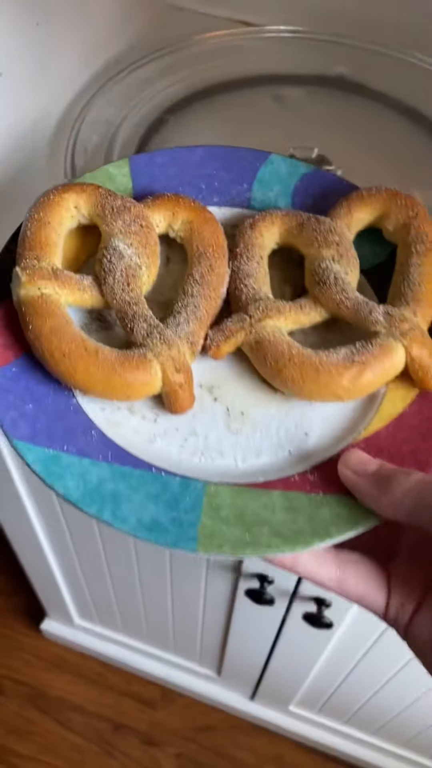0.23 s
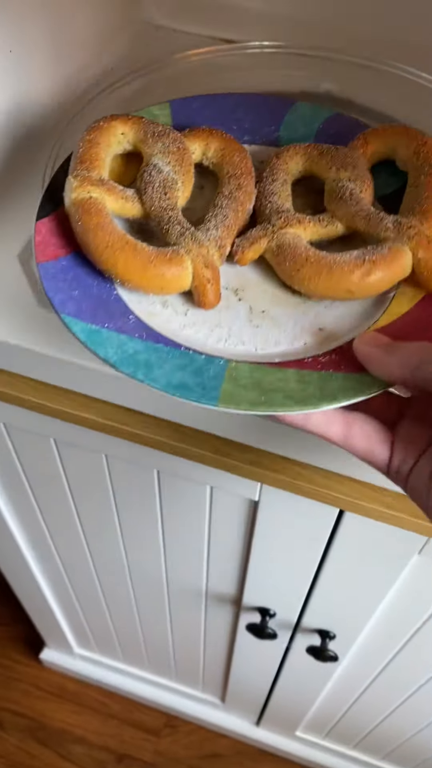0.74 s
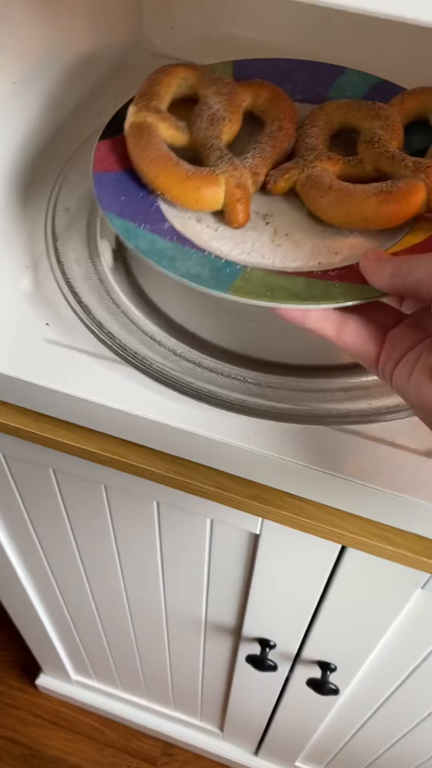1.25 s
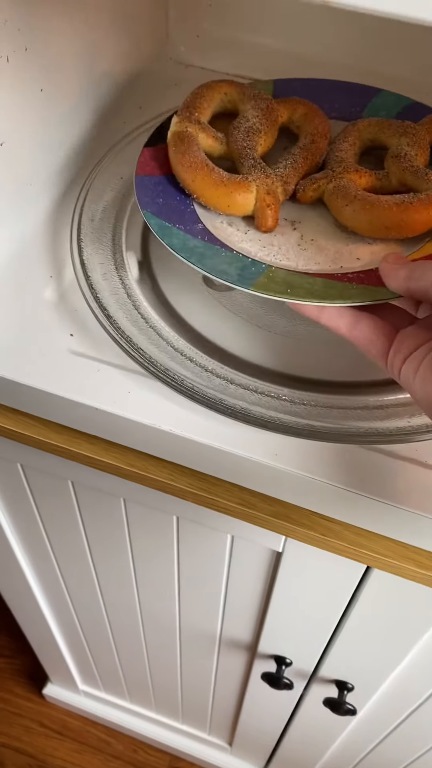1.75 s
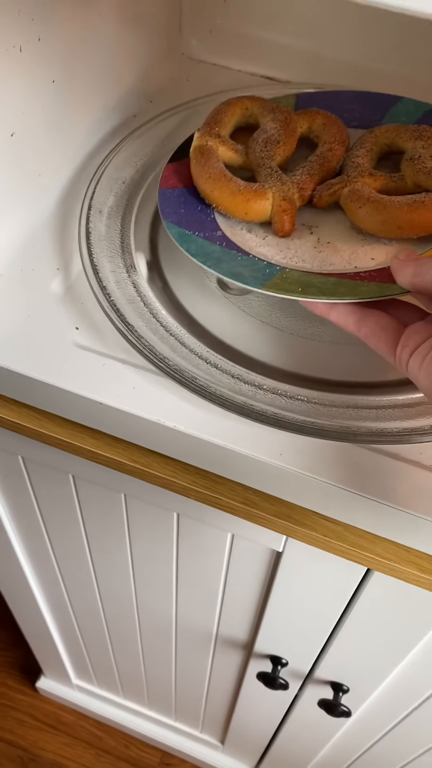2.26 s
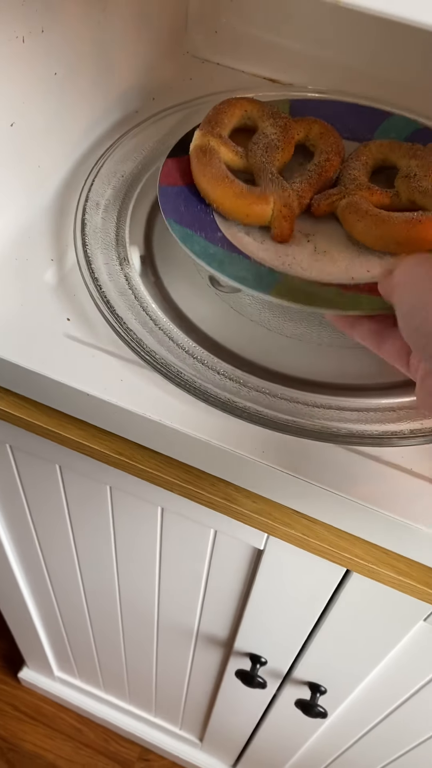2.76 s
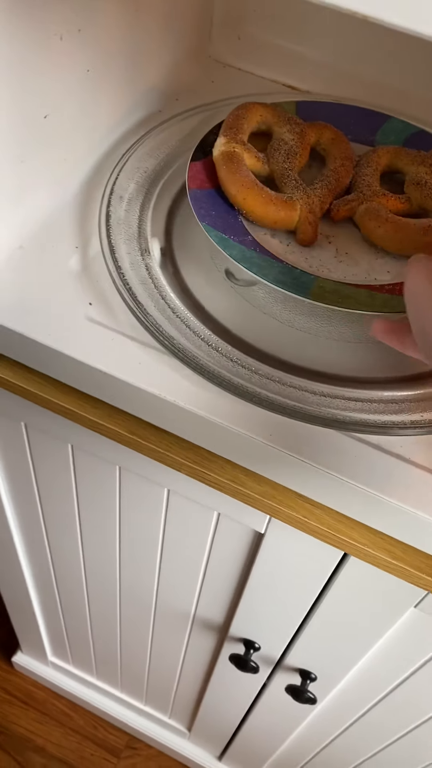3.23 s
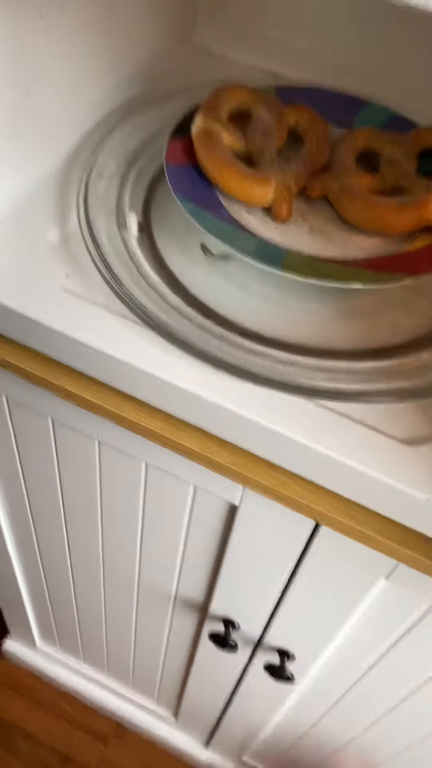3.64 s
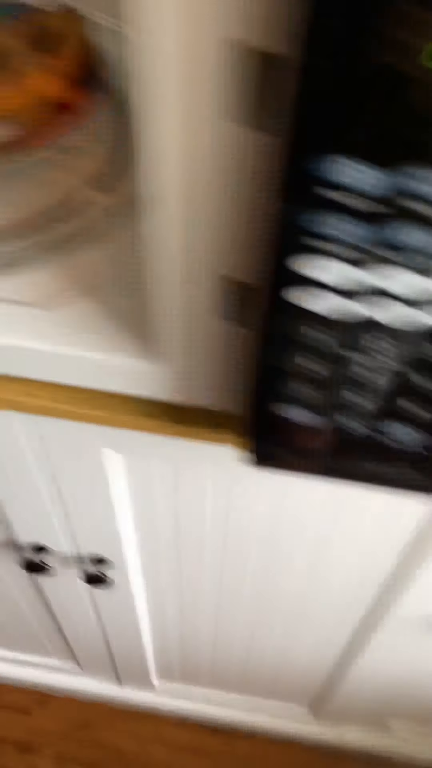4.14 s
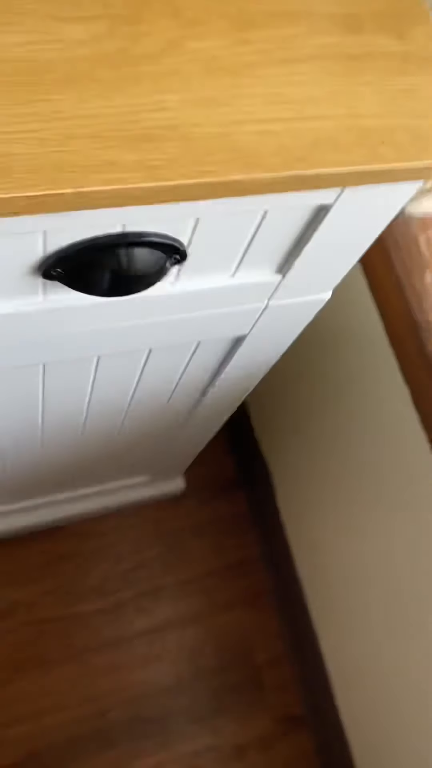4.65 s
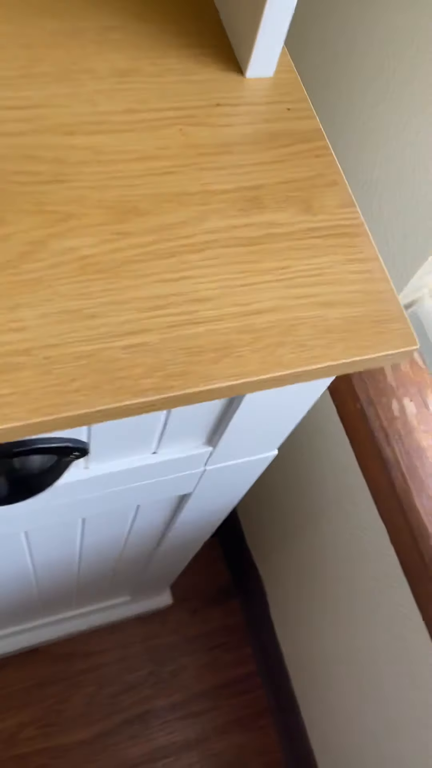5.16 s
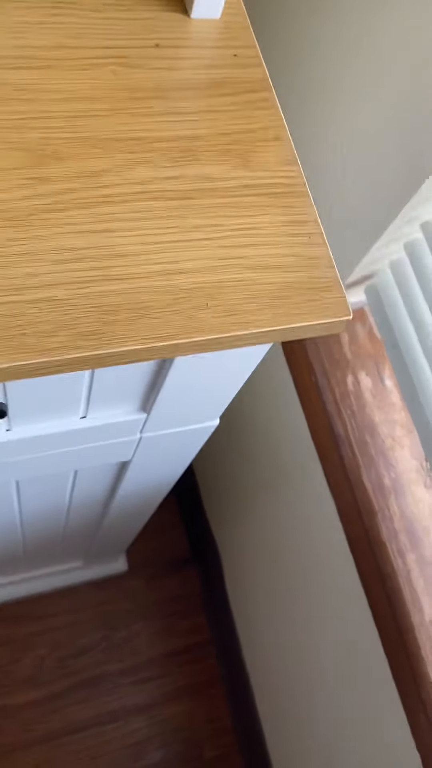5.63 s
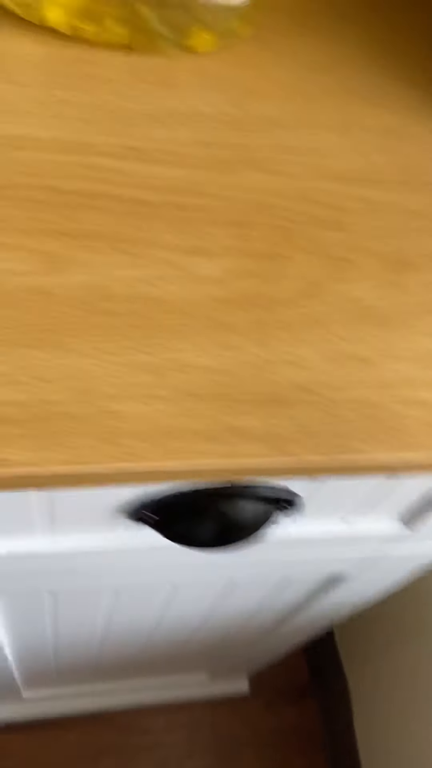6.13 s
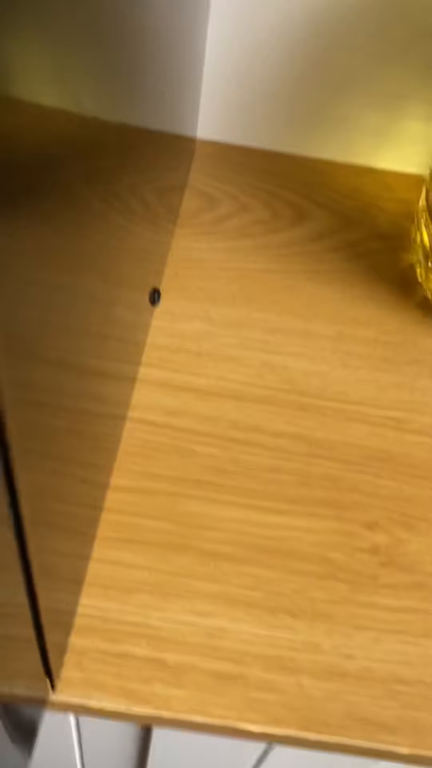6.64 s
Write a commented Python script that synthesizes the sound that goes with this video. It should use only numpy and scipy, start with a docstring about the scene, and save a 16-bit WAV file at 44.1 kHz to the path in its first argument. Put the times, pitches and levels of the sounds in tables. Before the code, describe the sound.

Over low kitchen rumble, a ceramic plate bumps inside a microwave with light rim ticks, then lands on the glass turntable in a bright chattering clink. It scrapes briefly and clinks down again, sharper. A sleeve rustles, soft footfalls and small clicks follow, and the door slams with a latch clatter and hollow metal boom. Close handheld stereo microphone, small room.

```python
"""Over the low rumble of a small kitchen, a ceramic plate bumps into a microwave oven and its rim ticks.
It drags on the glass turntable and lands in two chattering clinks; clothes rustle with soft footfalls and small
clicks, and the door is pushed shut: latch, slam, booming steel case. Plate, tray and case ring as decaying sines;
clacks, rattles and footfalls are coloured noise dying away, and strokes of noise make the cloth and the graze.
The hand-held stereo recorder limits loud treble, as in the clinks."""
import sys
import numpy as np
from scipy import signal
from scipy.fft import rfft, irfft
from scipy.io import wavfile
from scipy.ndimage import uniform_filter1d, minimum_filter1d

SR = 44100
rng = np.random.default_rng(int(sys.argv[2]) if len(sys.argv) > 2 else 0)


def dump(signal):
    """Clip the signal to [-1, 1] and save it as 16-bit WAV at the path in sys.argv[1]."""
    limited = np.clip(np.atleast_2d(signal).T, -1, 1)
    pcm = np.round(limited * 32767).astype(np.int16)
    wavfile.write(sys.argv[1], SR, pcm)


N = 303849
LENGTH = 49152  # samples in one struck sound
T = np.arange(LENGTH) / SR

# modes of the ceramic plate: mode_hz, relative_level_db
PLATE_MODES = [(1110, -19.5), (1195, 0.5), (1310, -13), (1450, -4.5), (1975, 2), (2060, 0.5), (2099, 4),
               (2352, -1), (2430, -12.5), (3205, 3), (3290, -18), (3957, -9.5), (4700, 0), (6352, -12),
               (9375, -6.5)]
# modes of the glass tray: mode_hz, relative_level_db, t60_s
TRAY_MODES = [(371, -9, .6), (393, -11, 1.1), (937, -5, .8), (1157, -5, .55), (1238, -11, .75),
              (1710, -13, .9), (1933, -9, 1.05), (1995, -2, .6), (2180, -8, .55), (2433, -9, .6),
              (2751, -12, .6), (2956, -1, .62), (3230, -7, .58), (3950, -16, .6), (4160, -18, .55),
              (4640, -20, .48), (4883, -12, .55), (5440, -20, .48), (5750, -12, .5), (6019, -19, .38),
              (6352, -20, .45), (7704, -22, .26), (8240, -18, .34), (8400, -23, .36), (9370, -22, .42),
              (10020, -23, .38), (10280, -20, .33), (11050, -25, .3), (11720, -20, .26), (12080, -25, .3)]
# colour of a plate contact, before tilt and modes: frequency_hz, relative_level_db
CLACK_COLOUR = [(59, -54), (100, -22), (365, -10), (768, -12), (1170, -7), (1580, -17.5), (2040, -8.5),
                (3540, -19), (5900, -27), (7770, -57), (8280, -36), (10200, -34), (12400, -43.5),
                (13800, -65), (16000, -49.5)]


def amp(db):
    """Decibels to gain."""
    return 10 ** (np.asarray(db) / 20)


def unit(x):
    """Scales to rms 1."""
    return x / np.sqrt(np.mean(x ** 2) + 1e-20)


def read(points, hz):
    """Reads a table on a log-frequency axis."""
    f, value = np.transpose(points)
    return np.interp(np.log(hz + 1), np.log(f + 1), value)


def octaves(hz, centre_hz):
    """Distance in octaves."""
    return np.log2((hz + 1) / centre_hz)


def near(modes, hz, width_hz):
    """1 on a mode, falling towards 0 between modes."""
    return np.max([1 / (1 + ((hz - mode[0]) / width_hz) ** 2) for mode in modes], axis=0)


def add(mix, s, sound):
    """Mixes a sound in at time s."""
    part = mix[:, round(s * SR):][:, :sound.shape[1]]
    part += sound[:, :part.shape[1]]


def grains(depth_db, size):
    """A gain of rms 1 that flickers within milliseconds."""
    flicker = unit(uniform_filter1d(rng.standard_normal(size), size=100))
    return unit(amp(depth_db * flicker))


def noise(colour, size, grain_db=0, likeness=.75):
    """Mid and side noise of rms 1, partly a quarter turn apart; colour gives dB for each frequency."""
    mid, own = rfft(rng.standard_normal((2, size)) * grains(grain_db, size))
    side = 1j * likeness * mid + np.sqrt(1 - likeness ** 2) * own
    hz = np.fft.rfftfreq(size, 1 / SR)
    return unit(irfft(np.array([mid, side]) * amp(colour(hz)), size))


def strokes(rows):
    """Gain of sliding strokes: each swells tenfold over its rise and fades tenfold over its fall."""
    t = np.arange(N) / SR
    levels = [db - 20 * np.maximum((s - t) / rise, (t - s) / fall) for s, db, rise, fall in rows]
    return amp(np.max(levels, axis=0).clip(-200))


def burst(colour, t60, rise, room_db, grain_db=1):
    """Noise dying like countless damped modes, with the kitchen's tail; t60 gives seconds for each frequency."""
    # ring time of the kitchen: frequency_hz, t60_s
    kitchen_t60 = [(80, 0.27), (250, 1), (1000, 0.67), (4000, 0.61), (12000, 0.14)]
    hz, t, z = signal.stft(noise(colour, LENGTH, grain_db), SR, nperseg=256)
    direct = amp(-60 * t / t60(hz)[:, None])
    tail = amp(-60 * t / read(kitchen_t60, hz)[:, None])
    envelope = np.hypot(direct, amp(room_db) * tail)
    sound = signal.istft(z * envelope, SR, nperseg=256)[1][:, :LENGTH]
    return sound * np.minimum(T / rise, 1)


def ring(modes, rise):
    """Decaying sines (Hz, dB, t60) of rms 1 before decay and rise, mid and side a quarter turn apart."""
    t = T[T < 2 * max(t60 for _, _, t60 in modes)]
    z = sum(amp(db) * np.exp((2j * np.pi * hz - np.log(1000) / t60) * t) for hz, db, t60 in modes)
    z = np.pad(z, (0, LENGTH - len(t)))
    size = np.sqrt(sum(amp(db) ** 2 for _, db, _ in modes) / 2)
    return np.array([z.imag, z.real]) / size * np.minimum(T / rise, 1)


def room_tone(rumble_db=-44, tilt=-0.94, drone_hz=73, drone_width_hz=9, drone_db=-48, hum_hz=120, hum_db=-56):
    """Low rumble of the house with a fuzzy drone and a faint mains hum."""
    # colour of the rumble, before tilt: frequency_hz, relative_level_db
    rumble_colour = [(12, -56.5), (20, -36), (37, -22), (58, 0.5), (77, -1.5), (177, -13), (301, -12),
                     (410, -18.5), (472, -19), (513, -24), (2670, -45.5), (5380, -55), (7310, -74),
                     (9950, -55.5), (16000, -92)]
    rumble = noise(lambda f: read(rumble_colour, f) + tilt * octaves(f + 300, 300), N, likeness=0.26)
    drone = noise(lambda f: -20 * np.log10(1 + ((f - drone_hz) / drone_width_hz) ** 2), N)
    hum = np.sin(2 * np.pi * hum_hz * np.arange(N) / SR)
    return amp(rumble_db) * rumble + amp(drone_db) * drone + amp(hum_db) * hum


def oven(blows, spectrum, room_db, low_hz, grain_db, modal_db=7):
    """Panels and latch rattle unevenly while the steel case booms on below them."""
    # modes of the steel case: mode_hz, relative_level_db, t60_s
    case_modes = [(77, -11, 1.6), (93, 5, 0.14), (112.1, 0.5, 0.56), (134.1, -10, 1.24),
                  (142.8, -11.5, 2.15), (182.5, -17, 1.2), (186.3, -7, 0.64), (211.6, -11.5, 1.08),
                  (276, -8, 0.67), (308, -15.5, 0.73), (369, -9.5, 0.24), (375, -16, 0.74),
                  (508, -11.5, 0.33), (670, -22.5, 1.02), (717, -13.5, 0.26)]
    # pitches at which the door's panels and latch rattle: pitch_hz
    rattle_modes = [(941,), (1130,), (1300,), (1630,), (1815,), (2200,), (3100,), (3950,)]
    # ring time of the panels, before each blow's factor: frequency_hz, t60_s
    panel_t60 = [(80, 0.23), (300, 0.26), (1000, 0.21), (4000, 0.26), (12000, 0.19)]
    out = np.zeros((2, N))
    case = ring(case_modes, rise=0.0031)
    for s, db, tilt, rise, t60_factor, boom_db in blows:
        def colour(f):
            low_cut = -20 * np.log10(1 + (low_hz / (f + 1)) ** 2)
            rattles = modal_db * near(rattle_modes, f, width_hz=19)
            return read(spectrum, f) + tilt * octaves(f + 150, 500) + rattles + low_cut
        rattle = burst(colour, lambda f: t60_factor * read(panel_t60, f), rise, room_db, grain_db)
        add(out, s, amp(db) * rattle + amp(boom_db) * case)
    return out


def bumps():
    """The plate bumps the oven's floor, jolting panels and case."""
    # bumps: start_s, level_db, tilt_db_per_octave, rise_s, t60_factor, case_boom_db
    bump_blows = [(0.723, -37, 2.5, 0.0021, 0.75, -74), (0.733, -22, 1.5, 0.0071, 1, -57),
                  (0.752, -20, -2.5, 0.0011, 1, -54), (0.785, -21.5, 0.5, 0.0011, 1, -23.5)]
    # colour of a bump, before tilt, rattles and low cut: frequency_hz, relative_level_db
    bump_colour = [(35, -32), (60, -3.5), (139, -14.5), (180, 3), (244, -27), (301, 0.5), (338, -14),
                   (785, -20), (862, -19), (1170, -29.5), (3940, -38.5), (6430, -53), (7230, -69),
                   (10500, -56), (16000, -88)]
    return oven(bump_blows, bump_colour, room_db=-13.5, low_hz=90.24, grain_db=0.0)


def clack(tilt, t60_s=0.13, room_db=-25.0, modal_db=15, mode_width_hz=28):
    """The short noise of one contact, raised at the modes of plate and tray; tilt in dB per octave."""
    def colour(f):
        modes = modal_db * near(PLATE_MODES + TRAY_MODES, f, mode_width_hz)
        return read(CLACK_COLOUR, f) + modes + tilt * octaves(f, 2000)
    return burst(colour, lambda f: np.full_like(f, t60_s), 0.00028, room_db)


def plate_ring(favoured_hz, focus, t60):
    """The place of contact decides which of the plate's modes speak; focus in dB per octave."""
    modes = [(hz, db - focus * abs(octaves(hz, favoured_hz)), t60) for hz, db in PLATE_MODES]
    return ring(modes, rise=0.0011)


def touches(tick_db=-11, tick_tilt=0.9, focus_per_t60_s=570):
    """Light touches of the rim tick and ring the hand-damped plate; the longer the ring, the fewer modes speak."""
    # touches: start_s, level_db, favoured_pitch_hz, ring_t60_s
    rim_touches = [(0.741, -30.5, 1980, 0.073), (0.785, -43, 2085, 0.6), (0.813, -39, 3200, 0.089),
                   (0.814, -55.5, 6350, 0.19), (0.910, -47.5, 2130, .42), (1.067, -59, 3220, 0.093),
                   (1.857, -48.5, 2130, 0.22), (1.876, -51, 2050, .26), (1.900, -45.5, 3170, 0.068),
                   (1.984, -37.5, 3200, 0.05), (2.733, -37, 2250, .1), (2.803, -29.5, 2090, 0.11),
                   (2.828, -47.5, 3000, 0.063)]
    out = np.zeros((2, N))
    for s, db, hz, t60 in rim_touches:
        # the tick's level is against the ring's
        touch = plate_ring(hz, focus_per_t60_s * t60, t60) + amp(tick_db) * clack(tick_tilt)
        add(out, s, amp(db) * touch)
    return out


def graze(centre_hz=4150, width_hz=800, grain_db=4):
    """A short gritty rasp of glaze on enamel as the rim grazes the oven's wall."""
    # graze: peak_s, level_db, rise_s, fall_s
    graze_strokes = [(0.791, -38.5, 0.0088, 0.033)]
    rasp = noise(lambda f: -20 * np.log10(1 + ((f - centre_hz) / width_hz) ** 2), N, grain_db)
    return strokes(graze_strokes) * rasp


def scrape(slips_per_s=900, tilt=-4.0, modal_db=11, mode_width_hz=45, slip_t60=0.042, knock_hz=480, knock_db=6):
    """Tiny slips of the unglazed foot dragging on the glass tick through plate and tray."""
    # drags: peak_s, level_db, rise_s, fall_s
    drag_strokes = [(1.905, -52.5, 0.11, 0.0686), (2.0, -50.5, 0.045, .05), (2.675, -47, 0.13, 0.36),
                    (2.742, -34, .028, 0.06), (2.81, -30, 0.021, .055), (2.858, -39, 0.18, .01)]

    def colour(f):
        modes = modal_db * near(PLATE_MODES + TRAY_MODES, f, mode_width_hz)
        knock = knock_db * near([(knock_hz,)], f, width_hz=130)
        return read(CLACK_COLOUR, f) + tilt * octaves(f, 2000) + modes + knock
    slips = rng.standard_normal(N) * (rng.random(N) < slips_per_s / SR)
    force = strokes(drag_strokes)
    tick = burst(colour, lambda f: np.full_like(f, slip_t60), 0.0014, room_db=-22)
    tick = tick / np.linalg.norm(tick[0])
    return signal.fftconvolve((unit(slips) * force)[None], tick, axes=1)[:, :N]


def tray_ring(waver_depth=1.0, waver_hz=35):
    """The tray's modes, each wavering as reflections in the oven's cavity blur it."""
    knots = np.arange(256) / waver_hz
    z = 0
    for hz, db, t60 in TRAY_MODES:
        wander = rng.standard_normal(len(knots)) + 1j * rng.standard_normal(len(knots))
        waver = 1 + waver_depth * np.interp(T, knots, wander)
        z = z + amp(db) * waver * np.exp((2j * np.pi * hz - np.log(1000) / t60) * T)
    size = np.sqrt(sum(amp(db) ** 2 for _, db, _ in TRAY_MODES) * (.5 + waver_depth ** 2))
    return np.array([z.imag, z.real]) / size


def landings(unevenness=0.055, ring_focus=32, clink_db=3.5, clink_t60_s=.04, clink_focus=20):
    """The plate chatters onto the glass in a quick run of contacts, ringing while the tray sings."""
    # landings: hardest_contact_s, level_db, brightness_db_per_octave, contact_gap_s, build_up_db_per_contact,
    # settling_db_per_contact, ring_db, ring_pitch_hz, ring_t60_s, tray_db
    plate_landings = [(2.2805, -3, -2, .0085, 25, 16.5, -8.5, 1200, 0.18, -28),
                      (2.877, -1.5, 2, .0062, 8, 1.9, -0.5, 2116, 0.12, -20)]
    # from the softest contact to the hardest: harder is brighter
    clack_tilts = (-7, 4.1)  # dB per octave
    clink_hz = (950, 2100)  # pitch the contact favours
    flattening_tilt = 0.39  # dB per octave per contact after the hardest, as the plate comes to lie flat
    out = np.zeros((2, N))
    for s, db, brightness, gap, build_db, settle_db, ring_db, hz, t60, tray_db in plate_landings:
        add(out, s, amp(ring_db) * plate_ring(hz, ring_focus, t60) + amp(tray_db) * tray_ring())
        for k in range(-3, 6):  # contact 0 is the hardest
            force = amp(db + min(k * build_db, -k * settle_db))
            hardness = np.sqrt(force)
            # the plate's choked ring at this contact
            clink = plate_ring(np.interp(hardness, (0, 1), clink_hz), clink_focus, clink_t60_s)
            tilt = brightness + np.interp(hardness, (0, 1), clack_tilts) + flattening_tilt * max(k, 0)
            contact = clack(tilt) + amp(clink_db) * clink
            contact_s = s + gap * (k + unevenness * rng.standard_normal())
            add(out, contact_s, force * contact)
    return out


def singing(pitch_hz=940):
    """The dragging foot keeps one low mode of the rubbed tray sounding briefly."""
    # singing: peak_s, level_db, rise_s, fall_s
    singing_strokes = [(2.665, -48, .14, .05)]
    turn = 2 * np.pi * pitch_hz * np.arange(N) / SR
    return strokes(singing_strokes) * np.array([np.sin(turn), np.cos(turn)])


def clothes(gain_db=1, grain_db=2):
    """A sleeve slides in grainy strokes as the arm draws back."""
    # strokes of the sleeve, before the gain: peak_s, level_db, rise_s, fall_s
    sleeve_strokes = [(3.488, -79.5, .2, .07), (3.735, -68.5, 0.022, 0.24), (4.1, -70.5, .12, .09),
                      (4.222, -64.5, 0.063, 0.11), (4.348, -56, 0.08, 0.055), (4.398, -62.5, .03, .015),
                      (4.49, -70, 0.055, 0.083)]
    # colour of the cloth: frequency_hz, relative_level_db
    cloth_colour = [(500, -1), (1500, 0.5), (4500, -2.5), (6200, -2.5), (7300, -23.5), (9000, 1.5),
                    (11500, -3), (13500, -10), (15500, -14.5)]
    rustle = noise(lambda f: read(cloth_colour, f), N, grain_db)
    return amp(gain_db) * strokes(sleeve_strokes) * rustle


def footfalls_and_clicks(skirt_db=6, room_db=-16, dull_hz=6500):
    """Soft footfalls and small clicks of cloth, foot or door handle, each one resonance in noise."""
    # footfalls and small clicks: start_s, level_db, centre_hz, width_octaves, rise_s, t60_s
    small_knocks = [ (3.963, -58, 1390, 0.87, 0.0018, 0.047), (4.105, -54.5, 3290, 0.66, .004, 0.05),
                    (4.17, -53.5, 3040, 2.2, 0.0023, 0.026), (4.245, -51.5, 1165, 0.78, 0.0077, 0.092),
                    (4.372, -49, 1474, 1.4, 0.001, 0.05), (4.765, -42.5, 329.5, .5, 0.0044, 0.13),
                    (4.786, -57.5, 5120, 0.095, 0.0028, 0.058), (4.841, -40, 810, 0.98, 0.0036, 0.27),
                    (5.303, -52, 1090, 0.91, 0.016, 0.12), (6.206, -55.5, 987, 1.37, 0.0073, 0.12)]
    out = np.zeros((2, N))
    for s, db, hz, width, rise, t60 in small_knocks:
        def colour(f):
            resonance = -2 * skirt_db * np.log1p((octaves(f, hz) / width) ** 2)
            return resonance - 20 * np.log10(1 + (f / dull_hz) ** 4)
        add(out, s, amp(db) * burst(colour, lambda f: np.full_like(f, t60), rise, room_db))
    return out


def door():
    """Latch and door slam into the oven, whose steel case booms."""
    # latch and door: start_s, level_db, tilt_db_per_octave, rise_s, t60_factor, case_boom_db
    door_blows = [(5.565, -27.5, 1, 0.0087, 0.92, -51.5), (5.590, -15.5, -1.5, 0.011, 0.65, -34.5),
                  (5.613, -27.5, 1, 0.0014, 0.77, -43), (5.636, -19, 2, 0.004, 1.1, -36.5),
                  (5.649, -7.5, 0.5, 0.0022, 0.5, -36), (5.657, -15.5, -0.5, 0.0013, 1.61, -7),
                  (5.813, -33, 2.5, 0.0033, 0.76, -30), (5.915, -56, 6, 0.0018, 0.91, -67.5)]
    # colour of the door's thud, before tilt, rattles and low cut: frequency_hz, relative_level_db
    thud_colour = [(59, -33), (100, 0), (295, -6.5), (442, -16.5), (547, -13), (836, -24.5), (1100, -24.5),
                   (1830, -24.5), (3540, -33.5), (4980, -35), (7290, -55), (10000, -41.5), (16000, -66.5)]
    return oven(door_blows, thud_colour, room_db=-19.0, low_hz=130.7, grain_db=-2.0)


def scene(width_db=-0.5):
    """All sources as mid and side, turned into left and right; the bass is nearly mono, the treble wide."""
    # stereo width, before width_db is added: frequency_hz, side_gain_db
    side_width = [(60, -31), (92, -19.5), (140, -39.5), (210, -30.5), (330, -21.5), (500, -7.5),
                  (770, -2.5), (1170, 0), (1790, -4.5), (2740, -0.5), (4190, -4.5), (6410, 6.5),
                  (9810, -2.5), (15000, 5.5)]
    plate = touches() + landings() + scrape() + graze()
    mid, side = room_tone() + bumps() + plate + singing() + clothes() + footfalls_and_clicks() + door()
    side_db = width_db + read(side_width, np.fft.rfftfreq(N, 1 / SR))
    side = irfft(rfft(side) * amp(side_db), N)
    return np.array([mid + side, mid - side])


def record(dry, low_cut_hz=48, split_hz=300, limit_db=-7.0, hold_s=0.099, recovery_db_per_s=70, edge_hz=15900):
    """A limiter ducks loud treble, holds, then lets it swell back; low cut, soft clipping, band limit."""
    bass = signal.sosfiltfilt(signal.butter(2, split_hz, fs=SR, output="sos"), dry)
    treble = dry - bass
    power = uniform_filter1d((treble ** 2).mean(0), size=130)
    power_db = 10 * np.log10(abs(power) + 1e-12)
    excess_db = np.maximum(power_db - limit_db, 0)
    # hold the largest excess, then recover at a steady rate
    half = max(int(hold_s * SR / 2), 1)
    held_db = -minimum_filter1d(-excess_db, 2 * half + 1, origin=half)
    fall_db = np.arange(N) / SR * recovery_db_per_s
    duck_db = uniform_filter1d(np.maximum.accumulate(held_db + fall_db) - fall_db, size=60)
    out = bass + treble * amp(-duck_db)
    out = signal.sosfilt(signal.butter(3, low_cut_hz, "high", fs=SR, output="sos"), out)
    out = out / (1 + out ** 8) ** (1 / 8)  # soft clipping
    band_limit = signal.firwin(511, edge_hz, window=("kaiser", 9), fs=SR)
    return signal.oaconvolve(out, band_limit[None], "same")


dry = scene()
out = record(dry)
dump(out)
```